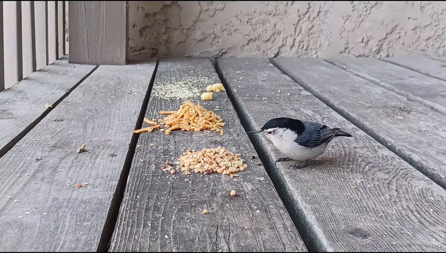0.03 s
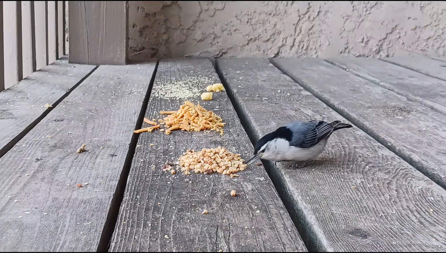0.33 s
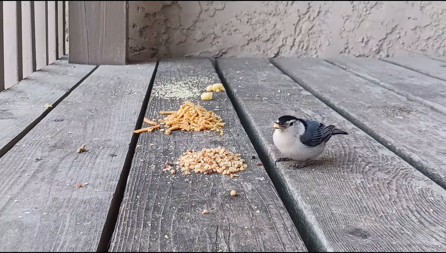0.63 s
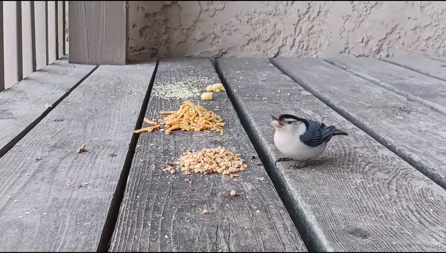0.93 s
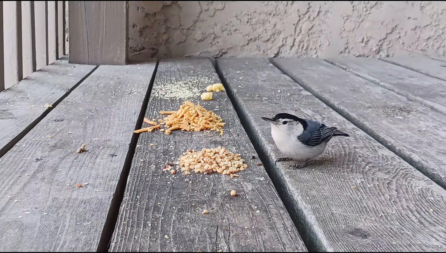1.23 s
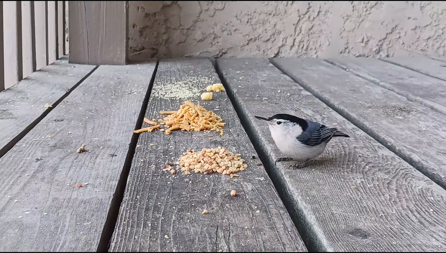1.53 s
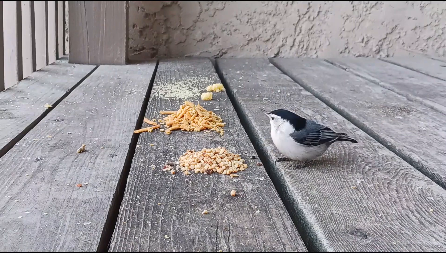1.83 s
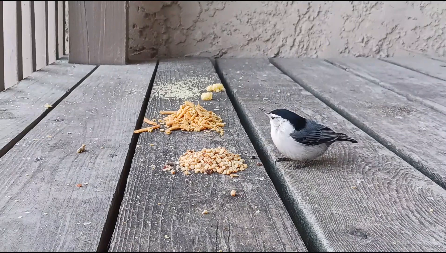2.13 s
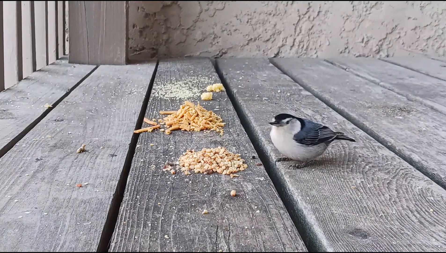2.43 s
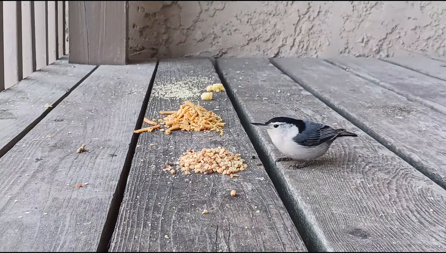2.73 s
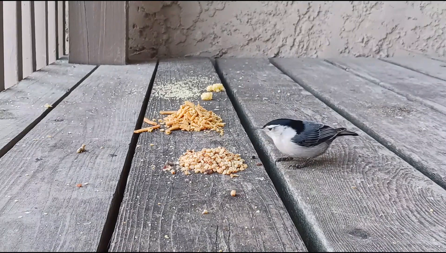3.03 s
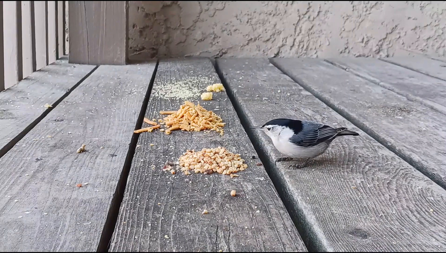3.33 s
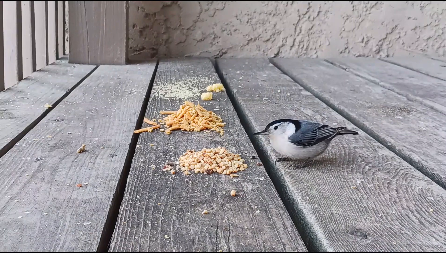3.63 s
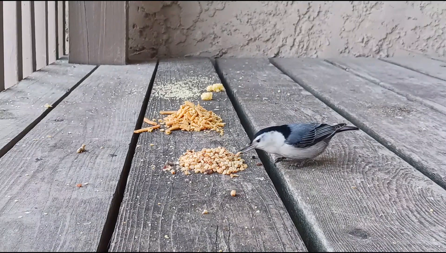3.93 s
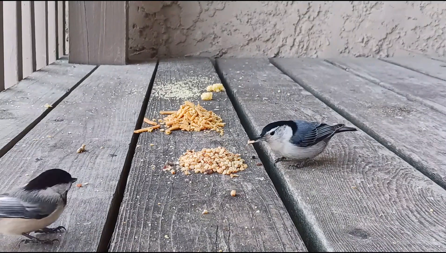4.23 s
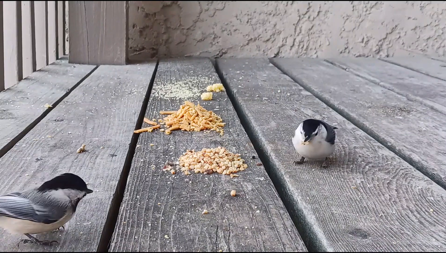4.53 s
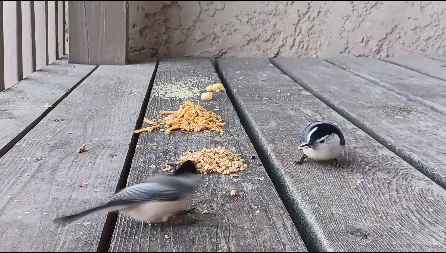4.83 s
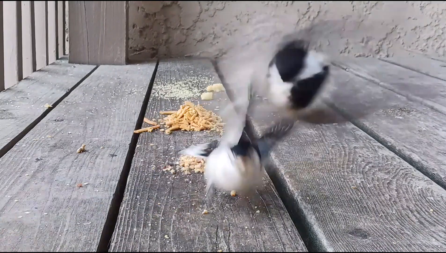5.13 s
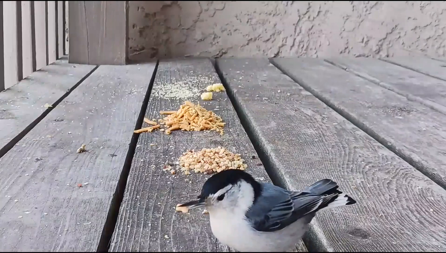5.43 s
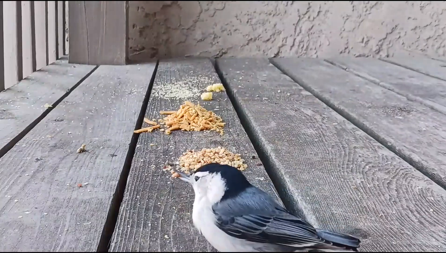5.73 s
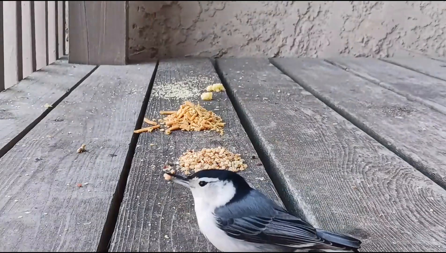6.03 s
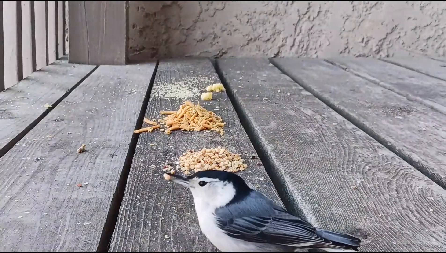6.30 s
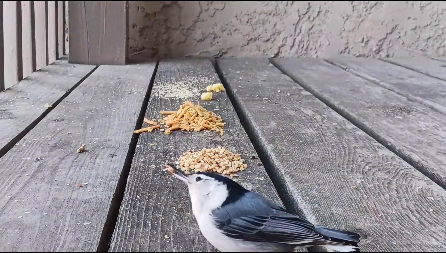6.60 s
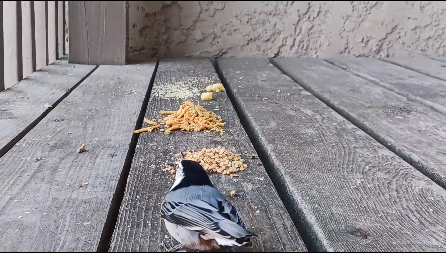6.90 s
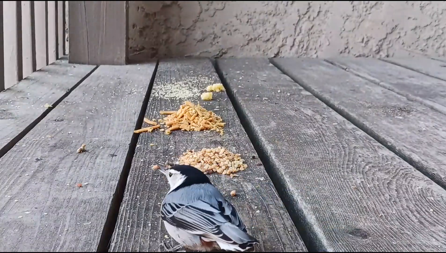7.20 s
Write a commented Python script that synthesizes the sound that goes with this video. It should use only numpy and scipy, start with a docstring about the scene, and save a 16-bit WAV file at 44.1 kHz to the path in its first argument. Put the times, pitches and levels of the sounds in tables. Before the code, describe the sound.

Faint songbird chirps and a few distant crow caws sound over a low drone of far traffic. A small bird flutters briefly past, and beaks tick lightly on seed and wooden boards. Then another bird flies just over the microphone, its wings thumping air against the left side. One loud, sharp chip follows very close, and faint pecks and scuffs finish.

```python
"""Small birds on a wooden deck.

A stereo microphone stands beside a house wall. One bird flutters past; another flies just overhead and
its wings buffet the left port; a third, close by, gives one sharp chip from both sides of its syrinx.
Beaks and claws tick on seed and boards, songbirds chirp in the trees and a crow caws far off,
over a low drone of distant traffic."""
import sys
import numpy as np
from scipy import signal
from scipy.fft import rfft, irfft
from scipy.io import wavfile

SR = 44100
rng = np.random.default_rng(int(sys.argv[2]) if len(sys.argv) > 2 else 0)


def generate_wav(signal):
    """Clip the signal to [-1, 1] and save it as 16-bit WAV at the path in sys.argv[1]."""
    frames = np.transpose(np.atleast_2d(signal))
    scaled = np.clip(frames, -1, 1) * 32767
    pcm = np.round(scaled).astype(np.int16)
    wavfile.write(sys.argv[1], SR, pcm)


N = 320166
TIME = np.arange(N) / SR
PORT_LAG_S = .00054   # sound from the left reaches the right port this much later

# Air moved by wings right at the microphone. Each row: frequency in Hz, relative level in dB.
CLOSE_AIR_SPECTRUM = [(15, -37), (25, -16), (59, 1.5), (103, -8), (140, -10.5), (350, -19), (429, -28.5),
                      (487, -26.5), (893, -53), (2000, -64), (2600, -80.5), (4400, -120)]
# Dry ticks, scuffs and feather flicks. Each row: frequency in Hz, relative level in dB.
TICK_SPECTRUM = [(500, -1), (2000, -4), (4000, -6.5), (8000, -3.5), (10000, -6), (13000, -1), (15500, -4.5)]


def from_db(db):
    """Decibels to gain."""
    return np.exp(np.asarray(db) * np.log(10) / 20)


def rms_one(x):
    """Scale to rms 1."""
    return x / np.sqrt(np.mean(x ** 2) + 1e-20)


def in_time(rows):
    """Each column of a curve at every sample; the first column gives the time in seconds."""
    s, *columns = np.transpose(rows)
    return [np.interp(TIME, s, c) for c in columns]


def lasting(start, end, attack, release):
    """1 from start to end, with ramps outside."""
    return np.clip(1 + np.minimum((TIME - start) / attack, (end - TIME) / release), 0, 1)


def during(rows, fade):
    """1 while a curve lasts, with short ramps outside it."""
    return lasting(rows[0][0], rows[-1][0], fade, fade)


def pan(left_db):
    """Left and right gains whose mean is 1."""
    gains = from_db(np.array([[.5], [-.5]]) * left_db)
    return gains / gains.mean(axis=0)


def colour(x, spectrum):
    """Shape a sound by a spectrum whose ends fall steeply; white noise keeps its level."""
    hz, db = np.transpose(spectrum)
    octave = np.log2(np.maximum(np.fft.rfftfreq(N, 1 / SR), 1))
    outside = np.abs(octave - np.clip(octave, np.log2(hz[0]), np.log2(hz[-1])))
    gain = from_db(np.interp(octave, np.log2(hz), db) - 30 * outside)
    return irfft(rfft(x) * rms_one(gain), N)


def noise(spectrum, alike=0):
    """Coloured stereo noise of rms 1, with the share `alike` of its power common to both sides."""
    common = np.sqrt(alike) * rng.standard_normal(N)
    return colour(common + np.sqrt(1 - alike) * rng.standard_normal((2, N)), spectrum)


def drift(rate):
    """A random wander of rms 1 that turns about `rate` times a second."""
    return rms_one(np.interp(TIME * rate, np.arange(N), rng.standard_normal(N)))


def resonate(x, hz, width_hz):
    """A resonance with gain 1 at its peak."""
    r = np.exp(-np.pi * width_hz / SR)
    feedback = [1, -2 * r * np.cos(2 * np.pi * hz / SR), r * r]
    return signal.lfilter(np.array([1, 0, -1]) * (1 - r * r) / 2, feedback, x + 1e-18)


def delayed(x, s):
    """The sound s seconds later."""
    return np.interp(TIME - s, TIME, x, left=0)


def from_left(left, right):
    """The two ports' signals for a sound that arrives from the left."""
    return np.array([left, delayed(right, PORT_LAG_S)])


def scatter(x, t60, gap):
    """Dense dying reflections of unit energy after a gap, different on each side."""
    t = TIME[:SR]
    tail = rng.standard_normal((2, SR)) * from_db(-60 * t / t60) * np.clip(t / gap - 1, 0, 1)
    tail /= np.sqrt(np.sum(tail ** 2, axis=1, keepdims=True))
    return signal.fftconvolve([x], tail, axes=1)[:, :N]


def far_tone(hz, db, waver_hz, rate):
    """A distant tone that the air makes waver in pitch and strength."""
    phase = 2 * np.pi * np.cumsum(hz + waver_hz * drift(rate)) / SR
    return from_db(db) * np.sin(phase) * (1 + 0.12 * drift(rate))


def distant_traffic():
    """A far road: an engine's drone comes and goes over rumble, road noise and a faint tyre whine."""
    # The traffic's swell. Each row: time in seconds, relative levels of rumble and road in dB.
    swell = [(0, -65, -77.5), (2, -63.5, -75), (2.7, -59, -73), (3.2, -60, -70), (4.1, -61.5, -73.5),
             (6, -67, -73.5), (7.26, -64.5, -71.5)]
    # Colours of rumble and road. Each row: frequency in Hz, relative level in dB.
    rumble_spectrum = [(25, -23.5), (45, -4.5), (60, -3.5), (80, -2), (105, -7.5), (140, -10), (180, -7.5),
                       (225, -16.5), (330, -14), (400, -26.5), (470, -22.5), (600, -33)]
    road_spectrum = [(400, -5), (480, -10), (600, -9), (750, -5.5), (950, -5.5), (1200, -11), (1700, -13),
                     (2100, -19.5), (2700, -27), (3500, -31)]
    # The engine's note. Each row: time in seconds, pitch in Hz.
    engine_pitch = [(1, 138.5), (2, 146.5), (4.2, 142.5), (7.26, 134)]
    # Its strength. Each row: time in seconds, relative level in dB.
    engine_level = [(0, -57), (.4, -66.5), (.57, -49), (.85, -57.5), (1.2, -51.5), (1.7, -62.5), (3.2, -52),
                    (3.7, -58), (4.15, -48), (4.45, -58.5), (4.7, -52.5), (5, -62), (6.3, -57),
                    (6.55, -57.5), (7.26, -69)]
    # The tyres. Each row: time in seconds, pitch in Hz, level in dB.
    tyres = [(0, 953, -76), (1.2, 900, -75), (1.8, 892, -93.5)]
    rumble_db, road_db = in_time(swell)
    engine = far_tone(*in_time(engine_pitch), *in_time(engine_level), waver_hz=4, rate=17)
    rumble = from_db(rumble_db + 3.5 + .6 * drift(5.5)) * noise(rumble_spectrum, alike=0.77)
    road = from_db(road_db + 1.5) * from_left(*noise(road_spectrum, alike=0.16)) * pan(4.0)
    whine = np.array([far_tone(*in_time(tyres), waver_hz=44.83, rate=270) for side in range(2)])
    return rumble + from_db(-1) * engine * pan(-2.304) + road + whine


def hiss():
    """A thin steady hiss, stronger on the left."""
    # Its colour. Each row: frequency in Hz, relative level in dB.
    spectrum = [(1470, -24.5), (2500, -2), (4000, -3), (4190, -4), (8520, -0.5), (10300, -1), (13800, 4.5),
                (15800, 1.5)]
    return from_db(-79.5) * noise(spectrum) * pan(5.5)


def crow():
    """Rough arched caws; distance leaves little but the throat's main resonance and a long echo."""
    # The caws. Each row: start and length in seconds, top pitch in Hz, relative level in dB.
    calls = [(1.57, 0.099, 421.4, -62.5), (1.97, 0.082, 421, -64.5), (2.445, 0.15, 415, -63.5),
             (2.95, 0.16, 420, -60.5)]
    level, pitch = np.zeros(N), np.full(N, calls[0][2], float)
    for s, length, hz, db in calls:
        arch = np.sin(np.pi * np.linspace(0, 1, int(length * SR)) ** 0.726).clip(0) ** .7
        span = slice(int(s * SR), int(s * SR) + len(arch))
        level[span] = from_db(db) * arch
        pitch[span] = hz * (1 - 0.098 * (1 - arch))
    phase = 2 * np.pi * np.cumsum(pitch * (1 + 0.025 * drift(250))) / SR
    pulses = sum(np.cos(k * phase) for k in range(2, 6)) * (1 + 2.0 * drift(500))
    throat = resonate(resonate(pulses, 1200, width_hz=440), 1190, width_hz=250)
    caws = level * rms_one(throat)
    direct = from_db(-10) * from_left(caws, caws)
    echo = from_db(-1.5) * scatter(delayed(caws, .08), t60=1.0, gap=0.0031)
    return (direct + scatter(caws, t60=0.63, gap=0.0021) + echo) * pan(5.9)


def hooked_call(u, arch_db, hook_db, top_hz, end_hz):
    """Pitch and strength as u runs from 0 to 1: an arch that softens as it dives, then an upward hook."""
    start_hz, dip_hz, dive_loss_db = 4720, 2830, 12
    top, dip = .24, .76   # shares of the call's length
    rise, dive = np.clip(u / top, 0, 1), np.clip((u - top) / (dip - top), 0, 1)
    arch, hook = np.clip(u / dip, 0, 1), np.clip((u - dip) / (1 - dip), 0, 1)
    hz = (start_hz + (top_hz - start_hz) * np.sin(np.pi / 2 * rise)
          + (dip_hz - top_hz) * np.sin(np.pi / 2 * dive) ** 2
          + (end_hz - dip_hz) * hook)
    arch_level = from_db(arch_db - dive_loss_db * dive) * np.sin(np.pi * arch)
    return hz, arch_level + from_db(hook_db) * np.sin(np.pi * hook)


def slur(u, start_hz, db):
    """Pitch and strength along one slur: it swells and fades while falling ever faster."""
    return start_hz * (1 - .4 * u ** 1.9), from_db(db) * np.sin(np.pi * u)


def whistle(u, db):
    """Pitch and strength along one thin, gently rising whistle."""
    start_hz, end_hz = 6500, 7360
    return start_hz + (end_hz - start_hz) * u, from_db(db) * np.sin(np.pi * u)


def tree_chirps():
    """Short husky calls from the trees, reaching the microphone mostly by way of trunks and walls."""
    # A songbird's hooked calls. Each row: start and length in seconds,
    # relative levels of arch and hook in dB, top and end pitch in Hz.
    hooked_calls = [(0.399, .089, -56.5, -55, 5030, 3890), (2.419, .112, -64, -52.5, 5437, 3420),
                    (3.536, .079, -57, -56, 5010, 3940), (6.632, 0.08, -60, -59, 5130, 4060)]
    # Falling slurs from birds in the trees, some overlapping.
    # Each row: start and length in seconds, first pitch in Hz, relative level in dB.
    slurs = [(1.3, 0.065, 5390, -67.5), (1.394, 0.063, 2410, -72), (2.449, 0.06, 3865, -60),
             (2.503, .04, 4480, -60), (2.602, .075, 4870, -67), (3.717, 0.051, 3450, -62),
             (4.281, 0.068, 4960, -71), (4.325, .07, 4760, -68.5), (4.905, 0.052, 5420, -83),
             (4.96, 0.054, 4620, -78), (5.158, .04, 3590, -55.5), (5.3, 0.041, 3220, -49)]
    # A farther bird's whistles. Each row: start and length in seconds, relative level in dB.
    whistles = [(1.105, .15, -85), (3.876, .12, -86)]
    song = np.zeros(N)
    unsteady = drift(1500)
    for shape, rows in ((hooked_call, hooked_calls), (slur, slurs), (whistle, whistles)):
        for s, length, *manner in rows:
            hz, level = shape(np.linspace(0, 1, int(length * SR)), *manner)
            span = slice(int(s * SR), int(s * SR) + len(hz))
            husk = np.interp(hz, [2500, 5200], [.08, .032])   # a slack membrane rasps, a taut one less
            phase = 2 * np.pi * np.cumsum(hz * (1 + husk * unsteady[span])) / SR
            song[span] += level * np.sin(phase)
    direct = from_db(-4) * from_left(song, song)
    early = from_db(3) * scatter(song, t60=0.17, gap=0.0026)
    late = from_db(-3) * scatter(song, t60=0.35, gap=0.021)
    return (direct + early + late) * pan(3.0)


def bursts(rows, fade_s):
    """Tiny crunches of dry noise near the left port, one for each start in seconds and level in dB."""
    level = np.zeros(N)
    t = TIME[:SR // 8]
    envelope = np.exp(-t / fade_s) * (1 - np.exp(-t / 0.00052))
    for s, db in rows:
        at = int(s * SR)
        level[at:at + len(t)] += from_db(db) * envelope[:N - at]
    return level * noise(TICK_SPECTRUM) * from_db([[0], [-10]])


def feeding():
    """Beaks peck at seed and boards; small feet scuff in bouts, with faint claw taps at random."""
    # The pecks. Each row: start in seconds, relative level in dB.
    pecks = [(2.9198, -38.5), (3.6535, -48), (4.03, -51.5), (4.0594, -57), (4.1777, -50), (4.8534, -53.5),
             (6.8297, -53), (6.937, -54)]
    # Bouts of scuffing. Each row: middle and length in seconds, relative level in dB.
    bouts = [(2.652, 1, -70.5), (4.055, 1, -75), (4.916, 0.67, -72), (6.848, 0.65, -71),
             (7.187, 0.27, -67.5)]
    taps_per_s, tap_boost_db = 16, 13
    scuff, taps = 0, list(pecks)
    for s, length, db in bouts:
        scuff += from_db(db) * np.cos(np.pi * np.clip((TIME - s) / length, -.5, .5))
    chances = rng.random((200, 2))
    for place, strength in chances[:int(taps_per_s * N / SR)]:
        at = int(place * (N - 1))
        taps.append((at / SR, 20 * np.log10(scuff[at] * strength + 1e-9) + tap_boost_db))
    grain_db = 1.6 * drift(200) + 3.4 * drift(35)
    ticks = from_db(-5.5) * bursts(taps, fade_s=0.0037)
    return ticks + scuff * from_db(grain_db - 4.5) * noise(TICK_SPECTRUM) * pan(3.96)


def nearing(t, approach, retreat):
    """Level in dB of a bird that is nearest at t = 0."""
    return np.minimum(approach * t, -retreat * t)


def flight(rows, air, feathers, beats_per_s, air_db, feather_db, air_left_db, throb_db,
           wake_s, rustle_share, stop_s):
    """Beating wings push air and rustle; the wake comes later and depends more on nearness."""
    wind, rustle = 0, 0
    for start, nearest, end, wind_db, rustle_db, approach, retreat, left_db in rows:
        flying = lasting(start, end, attack=0.03, release=stop_s)
        wake_db = nearing(TIME - nearest - wake_s, approach, retreat)
        near_db = rustle_share * nearing(TIME - nearest, approach, retreat)
        wind += flying * from_db(wind_db + wake_db)
        rustle += flying * from_db(rustle_db + near_db) * pan(left_db)
    beat = np.sin(2 * np.pi * np.cumsum(beats_per_s * (1 + 0.19 * drift(32))) / SR)
    push = wind * from_db(air_db + 4.7 * beat) * noise(air, alike=0.89) * pan(air_left_db)
    return push + rustle * from_db(feather_db + throb_db * beat + 1.4 * drift(400)) * noise(feathers)


def flutter_past():
    """A bird passes the microphone in a brief flutter of air and feathers."""
    # The pass. Each row: start, nearest moment and end in seconds, relative air and feather levels
    # in dB, the air's rise and fall in dB per second, the feathers' lean to the left in dB.
    path = [(2.73, 2.79, 2.934, -33.5, -56.5, 123, 109, 2.5)]
    # Colours of its air and feathers. Each row: frequency in Hz, relative level in dB.
    air = [(30, 0), (70, -5.5), (105, 3.5), (150, -15.5), (200, -10), (280, -17), (380, -14), (500, -25),
           (800, -32.5), (2000, -86)]
    feathers = [(470, -17), (800, -0.5), (1330, 0), (1600, -4), (2000, -2), (2800, -11), (3770, -4),
                (8550, -15), (15500, -16.5)]
    return flight(path, air, feathers, beats_per_s=14.79, air_db=1.0, feather_db=2.5,
                  air_left_db=-1.5, throb_db=0, wake_s=0.0012, rustle_share=.6, stop_s=0.2)


def flight_overhead():
    """A bird beats just over the microphone with sharp feather flicks, then shakes its wings on landing."""
    # Pass and shake. Each row: start, nearest moment and end in seconds, relative air and feather
    # levels in dB, the air's rise and fall in dB per second, the feathers' lean to the left in dB.
    path = [(5.08, 5.285, 5.52, -35.5, -53, 91, 85, 5), (5.56, 5.68, 5.71, -54.5, -67.5, 68.5, 100, 8)]
    # Colour of its feathers. Each row: frequency in Hz, relative level in dB.
    feathers = [(470, -29), (800, 1), (1330, -3.5), (1580, 1), (2380, -6), (3330, -1.5), (9560, -7.5),
                (13000, -1.5), (15500, -4.5)]
    # The flicks. Each row: start in seconds, relative level in dB.
    flicks = [(5.07, -46), (5.111, -43), (5.165, -45.5), (5.277, -34.5), (5.344, -45), (5.438, -42),
              (5.475, -39.5), (5.516, -42), (5.581, -54), (5.657, -59), (5.693, -49.5)]
    wings = flight(path, CLOSE_AIR_SPECTRUM, feathers, beats_per_s=26, air_db=4.5, feather_db=1.0,
                   air_left_db=9.5, throb_db=2.0, wake_s=.07, rustle_share=0.39, stop_s=0.065)
    return wings + bursts(flicks, fade_s=.006)


def wing_gusts():
    """Each close stroke swings the pressure at the left port once or twice and leaves brief eddies."""
    # The gusts. Each row: start in seconds, relative level in dB, rate of the swing in Hz.
    gusts = [(5.165, -28, 70), (5.261, -17.5, 59.6), (5.325, -8, 160), (5.343, -8, 56), (5.38, -11.5, 105),
             (5.437, -13.5, 59), (5.489, -17, 125), (5.512, -21.5, 56.6)]
    eddy_db, eddy_fade_s = -12, .018
    pressure, eddies = np.zeros(N), np.zeros(N)
    t = TIME[:SR // 4]
    for s, db, hz in gusts:
        span = slice(int(s * SR), int(s * SR) + len(t))
        cycles, age = t * hz, t / eddy_fade_s
        envelope = cycles / 0.68 * np.exp(1 - cycles / 0.5)
        pressure[span] += from_db(db) * envelope * np.sin(2 * np.pi * cycles)
        eddies[span] += from_db(db + eddy_db) * np.minimum(age * 4, 1) * np.exp(-age)
    return (pressure + eddies * noise(CLOSE_AIR_SPECTRUM)) * from_db([[0], [-18]])


def syrinx(rows, overtone_db):
    """One side of the syrinx: a gliding whistle with a weak octave."""
    hz, db = in_time(rows)
    phase = 2 * np.pi * np.cumsum(hz * (1 + 0.0061 * drift(2000))) / SR
    tone = np.sin(phase) + from_db(overtone_db) * np.sin(2 * phase)
    return from_db(db) * during(rows, fade=.001) * tone


def close_chip():
    """A hoarse start locks into two arched voices; the wall answers and the porch rings briefly."""
    # The two voices. Each row: time in seconds, pitch in Hz, level in dB.
    low_voice = [(5.754, 4300, -65.5), (5.7575, 5200, -17.5), (5.761, 6200, -12), (5.7645, 6800, -8),
                 (5.768, 7150, -9), (5.7697, 6750, -5.5), (5.771, 5500, -16.5), (5.773, 4100, -31)]
    high_voice = [(5.751, 5840, -44.5), (5.7555, 6400, -37.5), (5.759, 7400, -11.5), (5.763, 8200, -22),
                  (5.766, 8300, -25), (5.769, 7900, -50.5)]
    # The breathy rasp. Each row: time in seconds, level in dB.
    rasp_level = [(5.735, -51.5), (5.743, -27), (5.749, -27), (5.753, -28), (5.762, -24.5), (5.769, -29.5),
                  (5.776, -52)]
    # Colours of the rasp and the porch's reflections. Each row: frequency in Hz, relative level in dB.
    rasp_spectrum = [(900, -44), (1800, -21), (2800, -23.5), (3700, -5), (5000, -10), (6500, -0.5),
                     (8000, -4), (9500, -15), (12000, -5), (15500, -12.5)]
    porch_spectrum = [(1000, 3.5), (3000, 1), (3800, 1), (5300, 6), (6300, -1), (7100, -1), (8300, -5),
                      (10000, -8.5), (15500, -10)]
    rasp = from_db(in_time(rasp_level)[0]) * during(rasp_level, fade=.002) * noise(rasp_spectrum)[0]
    voice = syrinx(low_voice, overtone_db=-29) + syrinx(high_voice, overtone_db=-21.5) + rasp
    wall = from_db(-15) * delayed(voice, .0085)
    near = from_left(voice + wall, from_db(-17) * voice)
    # The rasp radiates more widely than the whistle.
    spread = colour(from_db(0.5) * voice + from_db(8) * rasp, porch_spectrum)
    early = from_db(-17) * scatter(spread, t60=0.13, gap=0.0034)
    late = from_db(-35) * scatter(spread, t60=.32, gap=.016)
    return near + early + late


def scene():
    """Everything that reaches the microphone on the deck."""
    wings = flutter_past() + flight_overhead()
    surroundings = distant_traffic() + hiss() + tree_chirps() + crow()
    return surroundings + wings + wing_gusts() + feeding() + close_chip()


def record(dry):
    """The highest treble is cut steeply."""
    cutoff_hz = 15900
    return signal.sosfilt(signal.ellip(12, .1, 80, cutoff_hz, fs=SR, output="sos"), dry)


dry = scene()
out = record(dry)
generate_wav(out)
```